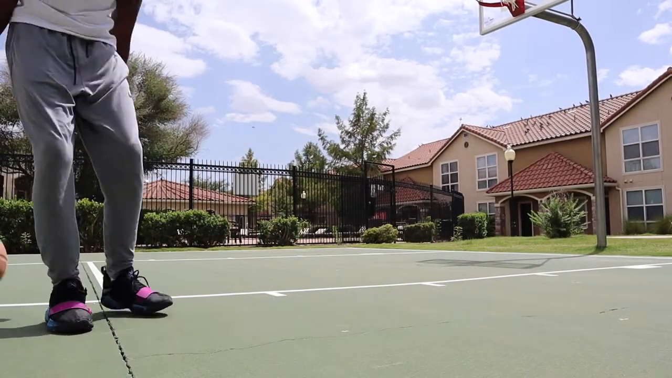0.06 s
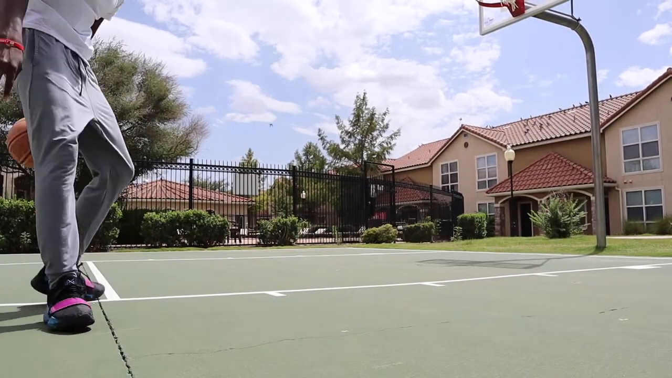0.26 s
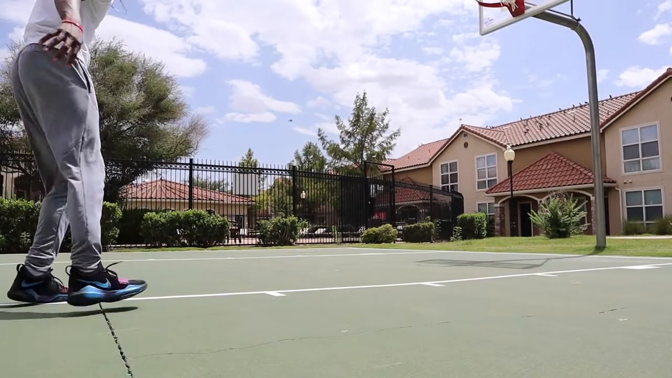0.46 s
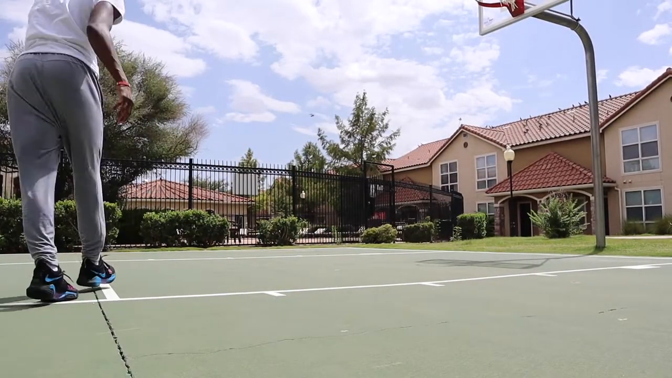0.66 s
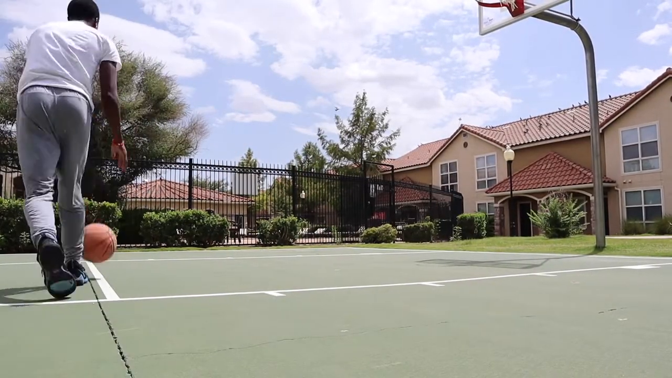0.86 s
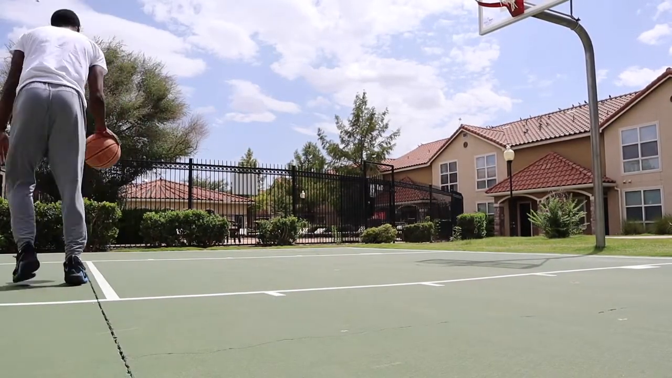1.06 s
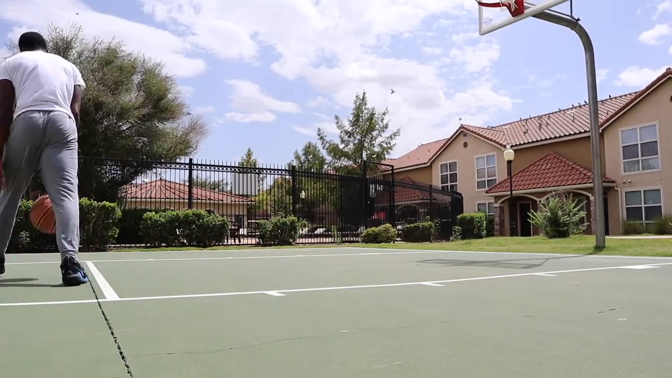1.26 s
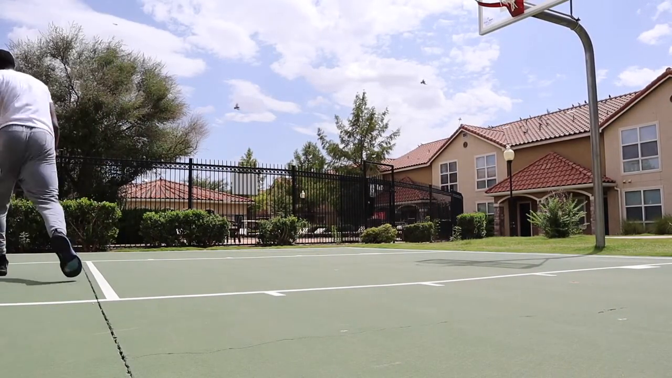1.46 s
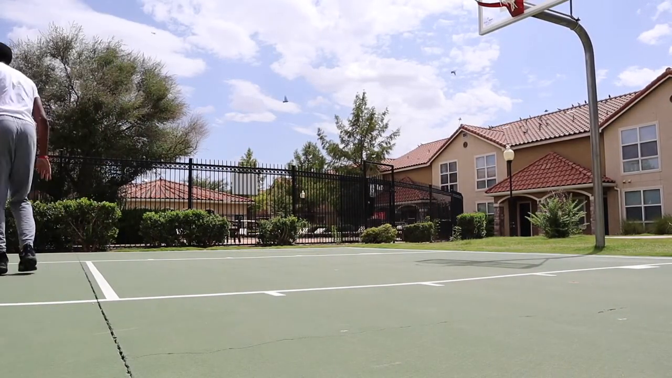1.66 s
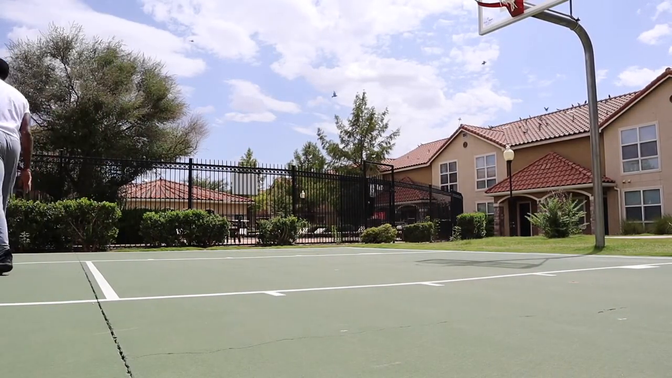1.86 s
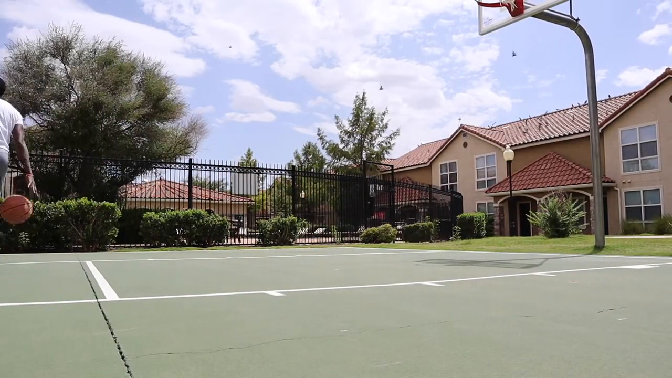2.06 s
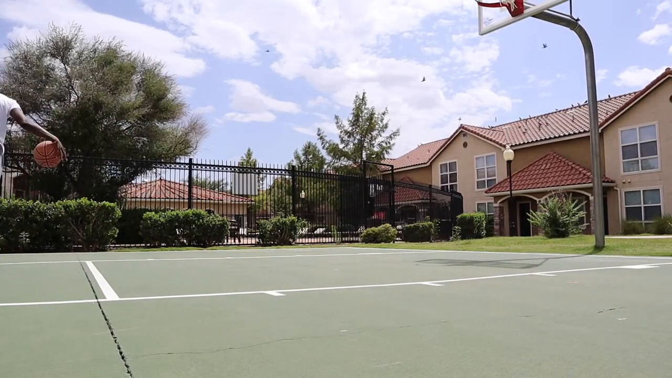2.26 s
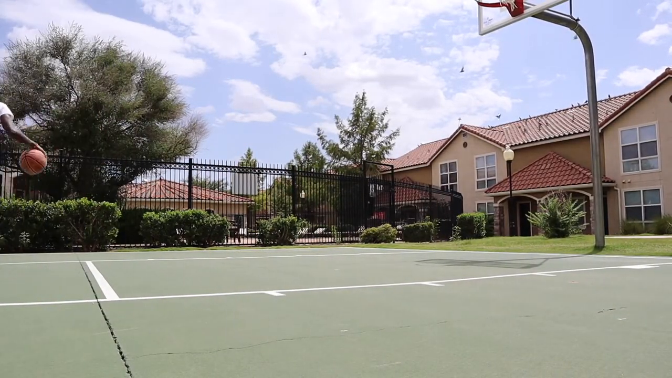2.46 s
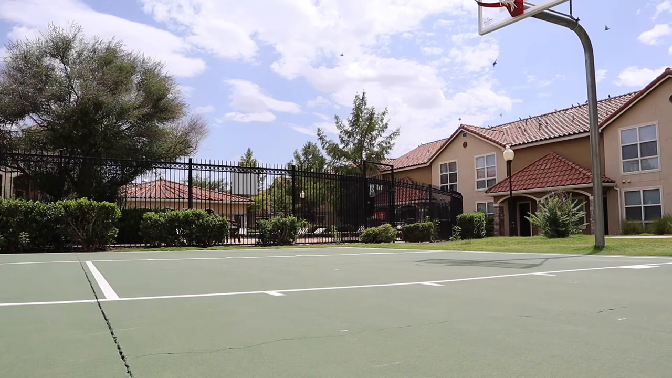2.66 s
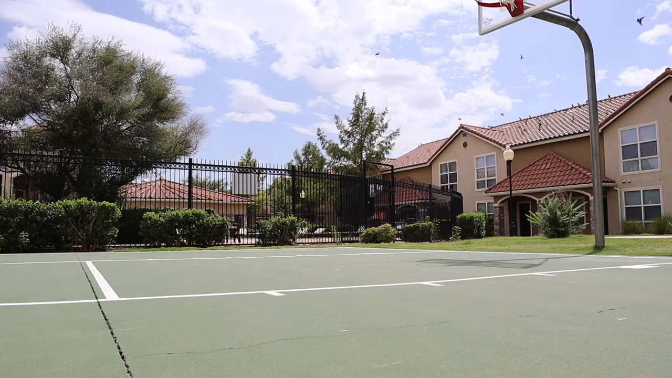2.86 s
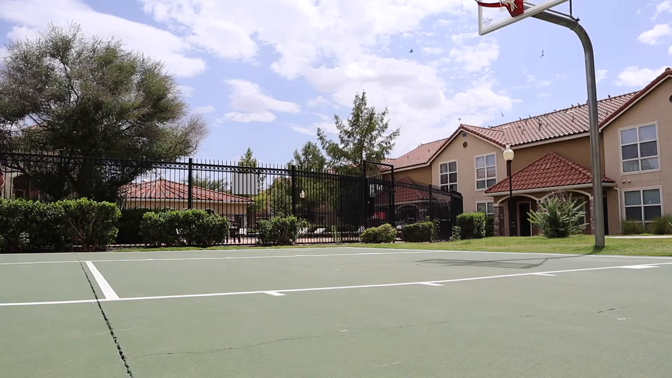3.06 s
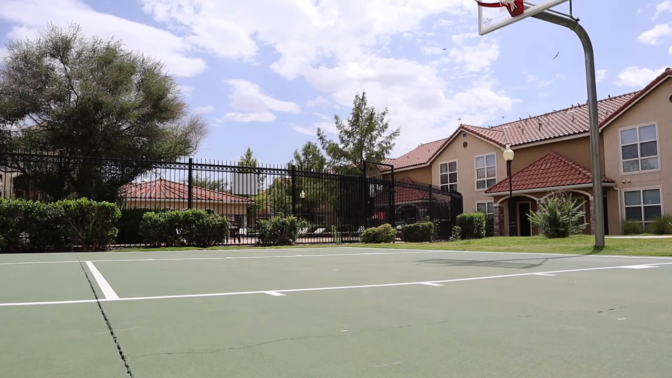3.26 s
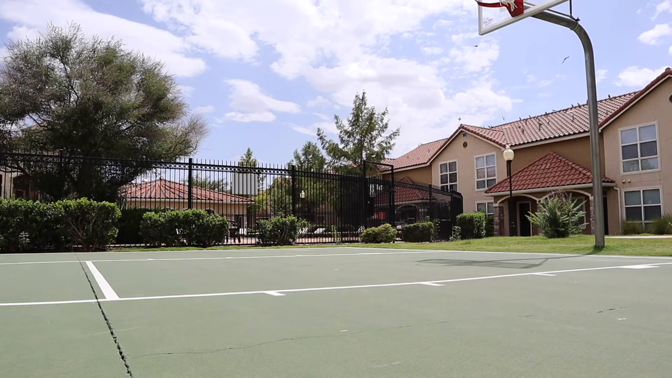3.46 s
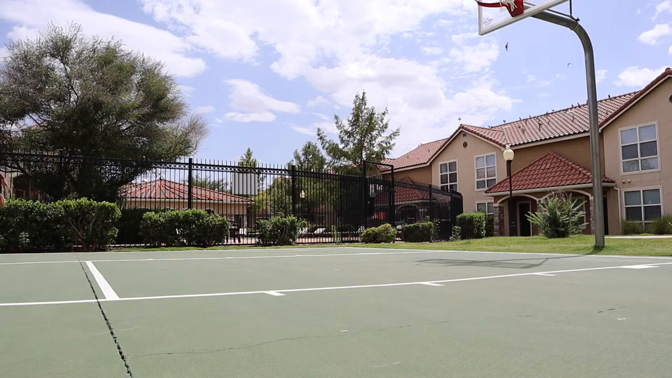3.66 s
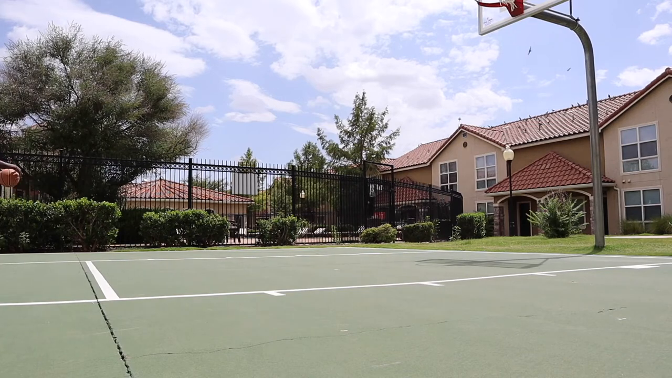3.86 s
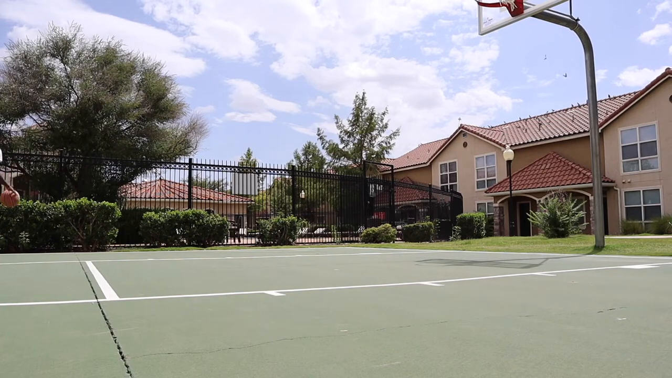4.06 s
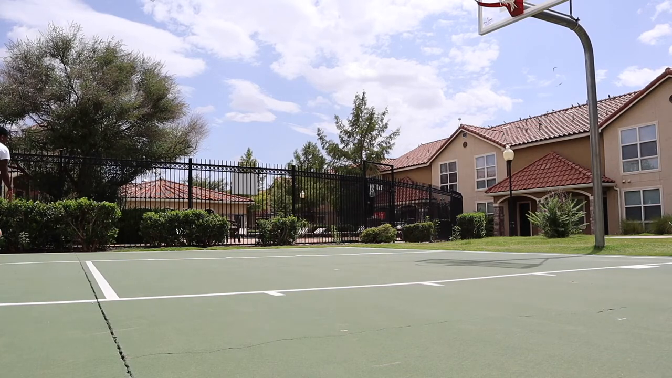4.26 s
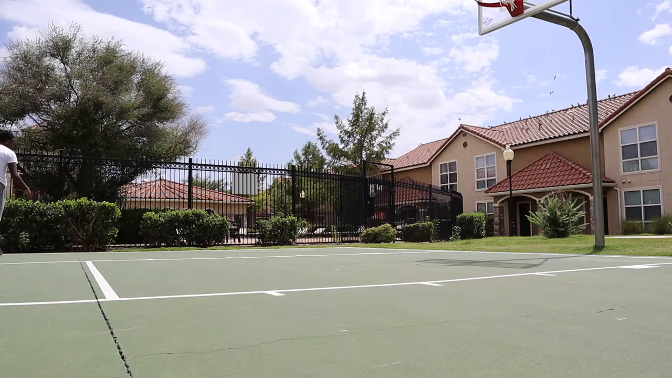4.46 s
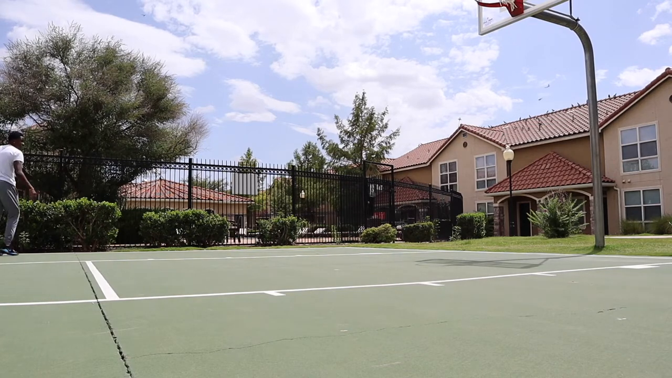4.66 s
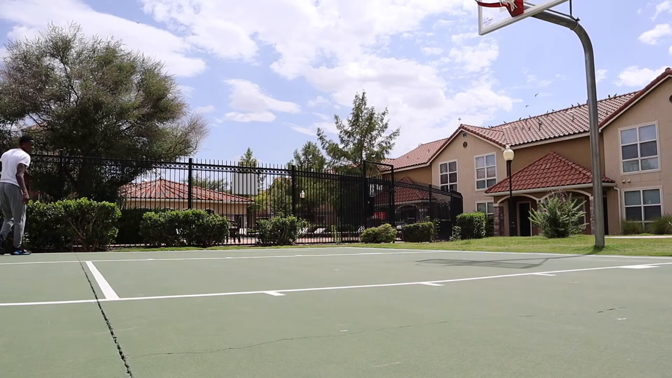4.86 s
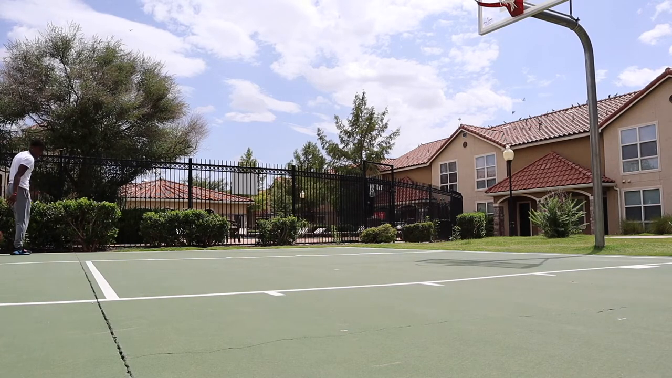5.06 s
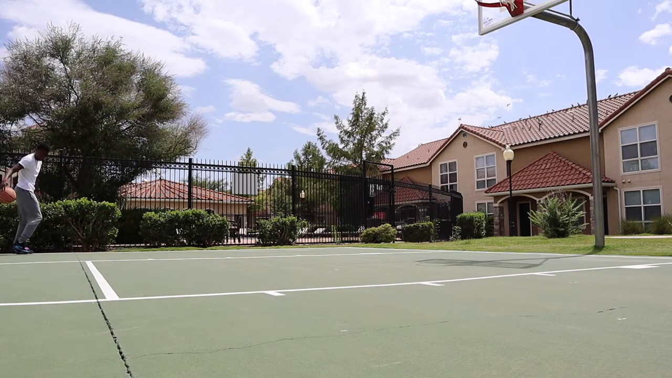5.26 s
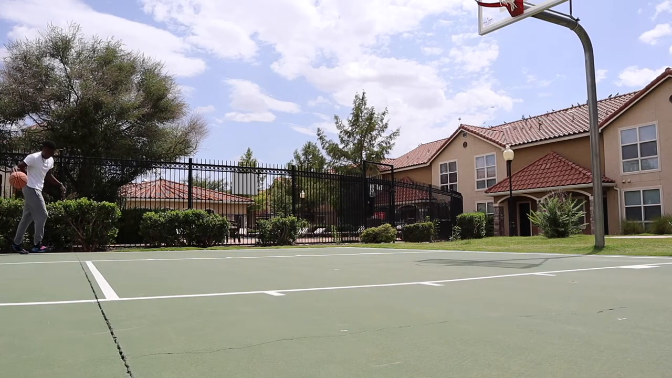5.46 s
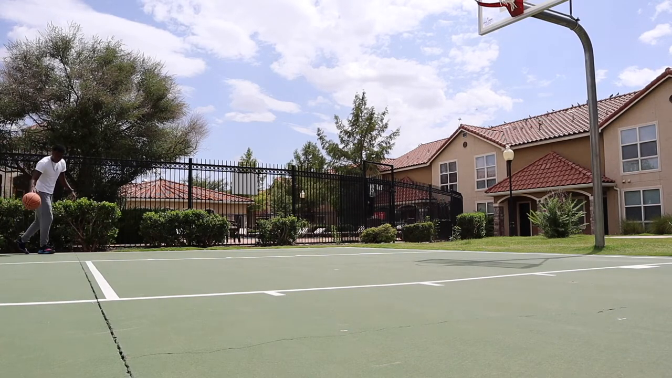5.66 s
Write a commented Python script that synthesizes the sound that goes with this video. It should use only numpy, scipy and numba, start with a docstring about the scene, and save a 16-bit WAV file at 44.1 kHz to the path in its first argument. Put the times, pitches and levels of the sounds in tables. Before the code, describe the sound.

A basketball is dribbled slowly on a hard outdoor court, eight sharp slapping thumps, each with a short echo off nearby houses. The first bounces are close and bright, and the later ones get softer and duller as the player moves away. Shoes scuff faintly, mostly near the start. A distant mower drones throughout over a low street rush. The microphone sits on the ground, with the ball to its left.

```python
"""Dribbling on an outdoor court

A basketball is dribbled away across a hard court, shoes scuffing, while a mower drones in the distance.
Each bounce is a click, a slap of squeezed air and a short thump of the shell, thrown back by the houses.
A camera on the ground widens the treble between its two ports; its gain control ducks the drone
after each bounce."""
import sys
import numpy as np
from scipy import signal
from scipy.fft import rfft, irfft
from scipy.io import wavfile
from scipy.ndimage import uniform_filter1d, minimum_filter1d
from numba import njit

SR = 44100
rng = np.random.default_rng(int(sys.argv[2]) if len(sys.argv) > 2 else 0)


def unload_wav(signal):
    """Save mono or channel-first audio to the path in sys.argv[1] as 16-bit WAV at rate SR, clipped to [-1, 1]."""
    wavfile.write(
        sys.argv[1],
        SR,
        np.round(np.clip(np.atleast_2d(signal).T, -1, 1) * 32767).astype(np.int16),
    )


N = 252252
TIME = np.arange(N) / SR
FREQ = np.maximum(np.arange(N // 2 + 1) * SR / N, 1)

# steady engine tones: (multiple of the firing rate, level [dB])
ENGINE_TONES = [(2, -28), (4, -40.5), (6, -39.5), (10, -45.5), (11, -50), (13, -57), (20, -46), (25, -46),
                (30, -53.5)]
# steady blade whine: (multiple of the blade rate, level [dB])
BLADE_TONES = [(1, -25.5), (3, -50.5), (4, -56), (6, -47), (9, -50.5)]
# hum of the engine's fifth harmonic: (time [s], level [dB])
HUM_LEVELS = [(0, -24), (.85, -23), (1.2, -21.5), (2, -26), (2.7, -26), (3.3, -24.5), (4.08, -22),
              (4.45, -23.5), (5.72, -23.5)]
# throb of the engine's third harmonic: (time of dip [s], level [dB], twin against the tone [dB])
BOOM_DIPS = [(0, -25.5, -17), (0.98, -31.5, -26), (1.55, -31, -10), (2.62, -26.5, -5), (4.17, -28.5, -8.5),
             (4.9, -30.5, -4), (5.31, -26, -2), (5.78, -34, 5.5)]
# throb of the blades' second harmonic: (time of dip [s], level [dB], twin against the tone [dB])
WHINE_DIPS = [(0.16, -35, -2), (0.73, -29.5, -6.5), (1.17, -34, -16.5), (1.62, -31, -17),
              (2.281, -31, -1.5), (2.791, -29, -8), (3.151, -32, -3.5), (3.611, -33, -7), (4.1, -32.5, 2),
              (4.541, -31, -8), (5.27, -31.5, -4), (6.1, -28.5, -10)]
# rush of the mower and the streets around: (frequency [Hz], level [dB])
RUSH_SPECTRUM = [(20, -4), (40, -6.5), (70, 5), (130, 1.5), (280, 1.5), (450, -2), (750, -3.5), (1100, -9),
                 (1290, -6), (1600, -8.5), (2200, -15), (3800, -25.5), (6200, -33.5), (8500, -46.5),
                 (11300, -54), (14000, -61.5)]
# the mower and rush slowly swell together: (time [s], level [dB])
DRONE_LEVELS = [(0, -3), (.8, -1), (1.6, -2.5), (2.4, -2.5), (3.2, -2), (4, -1.5), (4.9, -0.56), (5.72, 0)]
# the mix of each bounce: (time [s], click [dB], treble edge [Hz], grit [dB], ping [dB], ping pitch [Hz],
# slap [dB], slap pitch [Hz], pop [dB], squash [dB], flex [dB], flex pitch [Hz], suck [dB], peel [dB])
BOUNCE_HITS = [(0.1246, 3.5, 15500, -11.5, -13, 5000, -4.5, 1260, -18.5, -7.5, 2.5, 254, -13, -18.5),
               (0.9288, -1.5, 17000, -10.5, -9, 4200, -7.5, 1520, -9, -0.5, -1.5, 254, -14.5, -13.5),
               (1.365, 5, 16500, -6, -9, 3590, -6, 1190, -5, -0.5, -6, 266, -16.5, -16),
               (2.0159, -1, 6800, -11.5, -7.5, 5120, -9.5, 1258, -29, -7.5, -2, 272, -11, -21.5),
               (2.7120, -2.5, 11900, -13, -19.5, 5280, -7.5, 1202, -25, -5.5, -5.5, 267, -21.5, -23),
               (3.5460, -0.5, 6440, -12, -17.5, 3960, -12, 1112, -19, -10, -6, 253, -24.5, -28.5),
               (4.2712, 0, 7300, -14, -12, 4650, -17, 1690, -13.5, -9, -4.5, 259, -27, -20),
               (5.0825, -2, 4150, -19, -4.5, 3110, -16.5, 1010, -17, -8.5, -14.5, 248, -31, -19.5)]
# first touch of the skin on the court: (frequency [Hz], level [dB])
CLICK_SPECTRUM = [(500, -20), (1500, -4), (2700, 1), (3900, 1), (5200, 3), (7000, -1), (10500, -0.5),
                  (15000, -4)]
# chatter of the skin as it flattens: (delay [slap periods], level [dB])
CHATTER_TAPS = [(0, -7.5), (1, -26.5), (2.1, -30.5), (3.2, -22)]
# crunch of grit under the ball: (frequency [Hz], level [dB])
GRIT_SPECTRUM = [(300, 23), (700, -13.5), (2000, 15.5), (3800, -10.5), (4700, -15.5), (6500, -2),
                 (11000, -23.5), (15000, -38.5)]
# air squeezed out under the ball: (multiple of the slap pitch, level [dB], t60 [s])
SLAP_MODES = [(0.5, -17, 0.047), (1.001, 3, 0.014), (1.219, -1.5, 0.01), (1.602, 1, 0.0058),
              (2.2, -8.5, 0.01)]
# air ringing faintly inside the ball: (frequency [Hz], level against the slap [dB], t60 [s])
CAVITY_MODES = [(940, -13, 0.03), (1616, -24, 0.077), (2193, -24.5, 0.11), (3400, -24.5, 0.022)]
# grip of the skin peeling off the court: (frequency [Hz], level [dB])
PEEL_SPECTRUM = [(200, 2.5), (600, 6), (1000, 2), (1400, -3.5), (2200, -12), (4000, -20.5), (10000, -32),
                 (16000, -51)]
# slapback from the nearest walls: (delay [s], level [dB])
WALL_ECHOES = [(0.049, -25.5), (0.054, -14)]
# shoe scuffs, the narrowest a faint squeak: (time [s], length [s], level [dB], centre [Hz], width [oct])
SHOE_SCUFFS = [(0.39, 0.06, -46, 4200, 0.52), (0.742, 0.012, -52, 4000, 0.55),
               (0.806, 0.012, -58, 12000, 0.16), (0.817, 0.018, -55, 9500, 0.22),
               (0.825, 0.016, -44.5, 5700, 0.42), (0.862, 0.06, -52.5, 4400, 0.6),
               (0.985, 0.055, -43.5, 3600, 0.62), (2.218, 0.018, -68, 11500, 0.15),
               (2.742, 0.01, -46, 4800, 0.45), (3.576, 0.04, -41.5, 4100, 0.62),
               (4.845, 0.06, -55, 6000, 0.025)]
# treble widening between the ports: (frequency [Hz], side against mid [dB])
PORT_WIDTH = [(60, -58.5), (200, -22.5), (380, -19), (700, -12), (1300, -7.5), (2400, -1.5), (4400, -0.5),
              (8000, 9), (15000, 25.5)]
# the ball is well to one side, so the ports nearly oppose near 4 kHz: (frequency [Hz], extra side [dB])
BALL_SIDE = [(900, 2), (1900, 0), (2800, 6), (3900, 13), (5500, 7), (7500, 2), (11000, -3), (15000, -4)]


def undb(db):
    """Decibels to gain."""
    return 10 ** (np.asarray(db) / 20)


def response(points):
    """EQ curve through (frequency [Hz], level [dB]) points."""
    hz, db = np.transpose(points)
    return undb(np.interp(np.log(FREQ), np.log(hz), db))


def swell(points):
    """Gain envelope through (time [s], level [dB]) points."""
    times, db = np.transpose(points)
    return np.interp(TIME, times, undb(db))


def shape(x, gain):
    """Filter by a gain at every frequency."""
    return irfft(rfft(x) * gain, N)


def noise(gain):
    """Coloured noise of rms 1."""
    x = shape(rng.standard_normal(N), gain)
    return x / np.sqrt(np.mean(x ** 2))


def wander(hz):
    """Random modulation of rms 1, rolling off above hz."""
    return noise(np.exp(-(FREQ / hz) ** 2) * (FREQ > 1))


def add(track, start_s, sound):
    """Mix a sound in at a time."""
    i = int(start_s * SR)
    track[i:i + len(sound)] += sound[:N - i]


def ports(x, width_db, lead_rad, rad_per_octave=0.018, side_eq=1):
    """Stereo for a sound from the left: the ports' difference grows with pitch and leads in phase."""
    phase = np.clip(lead_rad + rad_per_octave * np.log2(FREQ / 1000), 0, np.pi / 2)
    side = shape(x, response(PORT_WIDTH) * side_eq * undb(width_db) * np.exp(1j * phase))
    return np.array([x + side, x - side])


def beating(cycles, dips):
    """A tone throbs against a slightly flat twin, which slips one cycle from each dip to the next."""
    times, db, twin_db = np.transpose(dips)
    slip = np.interp(TIME, times, np.arange(len(times)))
    twin = undb(np.interp(TIME, times, twin_db)) * np.sin(2 * np.pi * (cycles - slip))
    return undb(np.interp(TIME, times, db)) * (np.sin(2 * np.pi * cycles) - twin)


def mower(firing_hz=27.16, blade_hz=204.2, drift_hz=0.049, waver_db=1.2, blur_cycles=0.013):
    """Engine drone and blade whine, two tones throbbing; moving air blurs the higher ones more."""
    engine = np.cumsum(firing_hz + drift_hz * wander(2.6)) / SR
    blades = engine * blade_hz / firing_hz
    blur, waver = wander(4.2), wander(22.0)

    def carried(cycles, db=0):
        """Phase and amplitude of a tone after its way through the air."""
        shift, hz = rng.integers(N), cycles[-1] / TIME[-1]
        phase = cycles + rng.random() + blur_cycles * hz / 300 * np.roll(blur, shift)
        return phase, np.sqrt(2) * undb(db + waver_db * np.roll(waver, shift))

    tones = [carried(k * engine, db) for k, db in ENGINE_TONES]
    tones += [carried(k * blades, db) for k, db in BLADE_TONES]
    steady = sum(gain * np.sin(2 * np.pi * phase) for phase, gain in tones)
    phase, gain = carried(5 * engine)
    hum = gain * swell(HUM_LEVELS) * np.sin(2 * np.pi * phase)
    phase, gain = carried(3 * engine)
    boom = gain * beating(phase, BOOM_DIPS)
    phase, _ = carried(2 * blades)
    whine = np.sqrt(2) * beating(phase, WHINE_DIPS)
    return (steady + hum + boom + whine) * signal.windows.tukey(N, .002)


def rush(level_db=-27.5, flutter_db=1.76, flutter_below_hz=1800, diffuse_db=1):
    """Broad bed of mower and street noise, fluttering under a smooth hiss; part comes from all around."""
    colour = response(RUSH_SPECTRUM)
    steady = noise(colour)
    flutter = steady * (undb(flutter_db * wander(38)) - 1)
    direct = steady + shape(flutter, 1 / (1 + (FREQ / flutter_below_hz) ** 2))
    around = shape(noise(colour), response(PORT_WIDTH)) * undb(diffuse_db)
    return undb(level_db) * (ports(direct, width_db=7.0, lead_rad=1.0) + np.array([around, -around]))


def ring(t, hz, db, t60):
    """One struck mode, dying away."""
    return undb(db) * np.sin(2 * np.pi * hz * t) * np.exp(-np.log(1000) * t / t60)


def swing(t, hz, centre_s, length_s):
    """The shell gives: a few cycles that swell and die around a centre time."""
    position = np.clip((t - centre_s) / length_s, -.5, .5)
    return np.sin(2 * np.pi * hz * (t - centre_s)) * np.cos(np.pi * position) ** 2


def tick(gain, samples=512):
    """A tight, minimum-phase click of peak 1, coloured by an EQ curve."""
    cepstrum = irfft(np.log(gain), N)
    cepstrum[1:N // 2] *= 2
    cepstrum[N // 2:] = 0
    pulse = irfft(np.exp(rfft(cepstrum)), N)[:samples]
    return pulse / np.abs(pulse).max()


def ball(contact_s=0.0104, squash_hz=127, grit_s=0.0043, click_trim_db=-4, slap_rise_s=0.00034,
         peel_s=0.0034, rebound_db=-10, rebound_s=0.0011):
    """Skin clicks, grit crunches, trapped air slaps; the shell thumps, springs back and peels off."""
    out, t = np.zeros(N), TIME[:SR // 3]
    grit, grip = noise(response(GRIT_SPECTRUM)), noise(response(PEEL_SPECTRUM))
    cavity = sum(ring(t, *mode) for mode in CAVITY_MODES)
    squeeze = 1 - np.exp(-(t / slap_rise_s) ** 2)
    rebound = -undb(rebound_db) * np.exp(-((t - contact_s) / rebound_s) ** 2)
    squash = swing(t, squash_hz, centre_s=0.00611, length_s=0.024) + rebound
    for (start, click_db, edge_hz, grit_db, ping_db, ping_hz, slap_db, slap_hz,
         pop_db, squash_db, flex_db, flex_hz, suck_db, peel_db) in BOUNCE_HITS:
        now = slice(int(start * SR), int(start * SR) + len(t))
        softness = 1 / (1 + (FREQ / edge_hz) ** 4)  # a softer touch dulls click, crunch and ping
        click = -tick(response(CLICK_SPECTRUM) * softness)
        for periods, tap_db in CHATTER_TAPS:
            add(out, start + periods / slap_hz, undb(click_db + click_trim_db + tap_db) * click)
        crunch = undb(grit_db) * grit[now] * np.exp(-t / grit_s)
        ping = ring(t, ping_hz, ping_db, t60=0.002)  # taut skin, pitched by the spot that lands
        skin = np.zeros(N)
        add(skin, start, crunch + ping)
        out += shape(skin, softness)
        slap = squeeze * sum(ring(t, k * slap_hz, db, t60) for k, db, t60 in SLAP_MODES)
        pop = squeeze * ring(t, hz=626, db=pop_db, t60=0.0093)  # the shell dents hollowly
        flex = swing(t, flex_hz, centre_s=0.006, length_s=0.013)
        thump = undb(squash_db) * squash + undb(flex_db) * flex
        peel = undb(peel_db) * grip[now] * np.exp(-((t - contact_s) / peel_s) ** 2)
        add(out, start, undb(slap_db) * (slap + cavity) + pop + thump + peel)
        add(out, start + contact_s, -undb(suck_db) * slap)  # lifting off sucks air back underneath
    return out


def scatter(t60, onset_s):
    """Spectrum of a diffuse tail that builds up and dies away."""
    tail = rng.standard_normal(N) * np.exp(-np.log(1000) * TIME / t60)
    tail *= 1 - np.exp(-(TIME / onset_s) ** 2)
    return rfft(tail / np.linalg.norm(tail))


def houses(x, wall_hz=600, fence_db=-20, fence_hz=7000, fronts_db=-22, fronts_hz=1200):
    """Dull slapback off the walls, bright scatter off the fence, a short dark tail off the house fronts."""
    echoes = sum(undb(db) * np.exp(-2j * np.pi * FREQ * delay) for delay, db in WALL_ECHOES)
    walls = echoes / (1 + 1j * FREQ / wall_hz)
    fence = undb(fence_db) * scatter(t60=0.71, onset_s=0.02) / (1 + 1j * FREQ / fence_hz)
    fronts = undb(fronts_db) * scatter(t60=0.29, onset_s=0.033) / (1 + 1j * FREQ / fronts_hz)
    return shape(x, walls + fence + fronts)


def shoes(grain_db=4.0):
    """Soles drag over the gritty paint in short grainy hisses."""
    out = np.zeros(N)
    grain = undb(grain_db * wander(600))
    for peak_s, length_s, db, hz, octaves in SHOE_SCUFFS:
        hiss = noise(np.exp(-.5 * (np.log2(FREQ / hz) / octaves) ** 2))
        out += undb(db) * hiss * np.exp(-(2 * (TIME - peak_s) / length_s) ** 2)
    return out * grain


def scene():
    """Ball and shoes on the left, over a bed of mower drone."""
    bounces = ball()
    drone = (ports(mower(), width_db=1.0, lead_rad=0.79) + rush()) * swell(DRONE_LEVELS)
    direct = ports(bounces, width_db=-1, lead_rad=1.05, side_eq=response(BALL_SIDE))
    scuffs = ports(shoes(), width_db=5, lead_rad=0.65)
    echoes = ports(houses(bounces), width_db=-2.0, lead_rad=1.3)
    return direct + scuffs + echoes + drone


@njit
def duck(over_db, attack_s, release_s, share, recover_s):
    """Gain reduction in dB: a quick stage grabs the peak, a slow one keeps a share of it."""
    out, quick, slow = np.empty(len(over_db)), 0., 0.
    for i in range(len(over_db)):
        quick += (over_db[i] - quick) / (SR * (attack_s if over_db[i] > quick else release_s))
        slow = max(slow * (1 - 1 / (SR * recover_s)), share * quick)
        out[i] = max(quick, slow)
    return out


def record(dry, mic_hz=12300, limit_db=-3.0, hold_s=0.015, top_hz=16600):
    """The mic rolls off the top; gain control ducks each bounce and creeps back; overshoots clip."""
    mic = signal.sosfilt(signal.butter(6, mic_hz, fs=SR, output="sos"), dry)
    peak = uniform_filter1d(np.abs(mic).max(axis=0), size=24)
    over_db = np.maximum(20 * np.log10(peak + 1e-9) - limit_db, 0)
    half_hold = int(hold_s * SR / 2)
    held_db = -minimum_filter1d(-over_db, 2 * half_hold + 1, origin=half_hold, mode="constant")
    duck_db = duck(held_db, attack_s=0.00025, release_s=0.031, share=0.59, recover_s=0.37)
    clipped = np.clip(mic * undb(-duck_db), -1, 1)
    return signal.sosfilt(signal.ellip(8, .2, 70, top_hz, fs=SR, output="sos"), clipped)


dry = scene()
out = record(dry)
unload_wav(out)
```